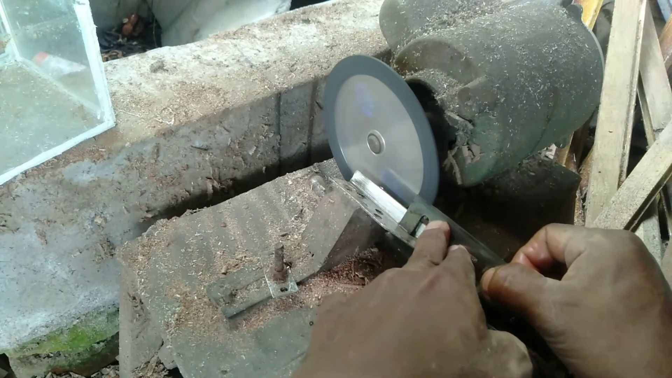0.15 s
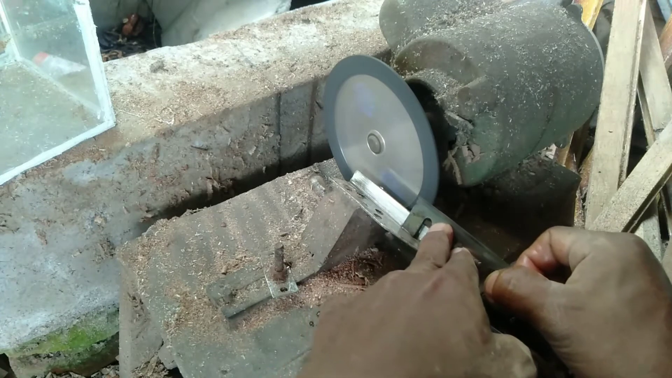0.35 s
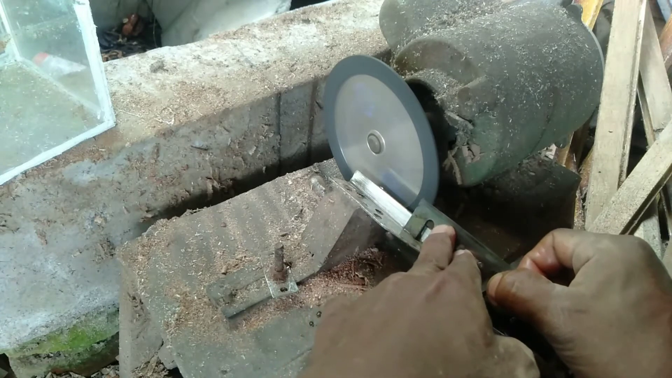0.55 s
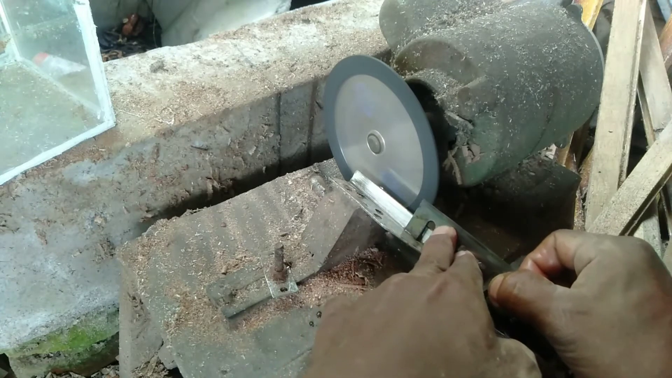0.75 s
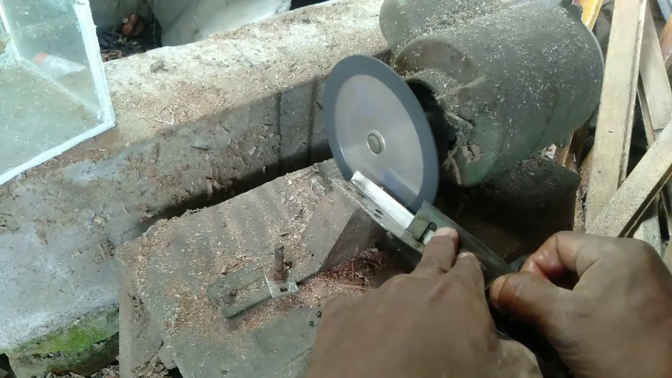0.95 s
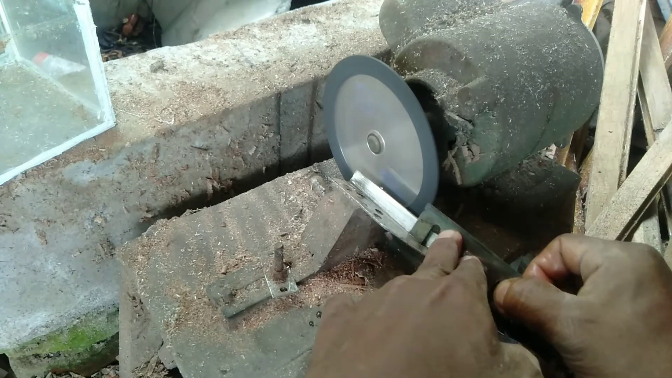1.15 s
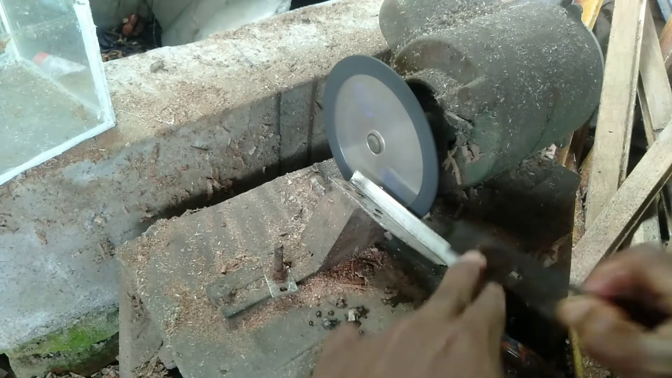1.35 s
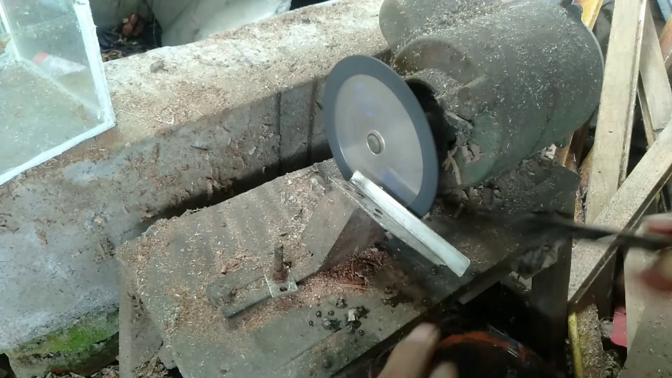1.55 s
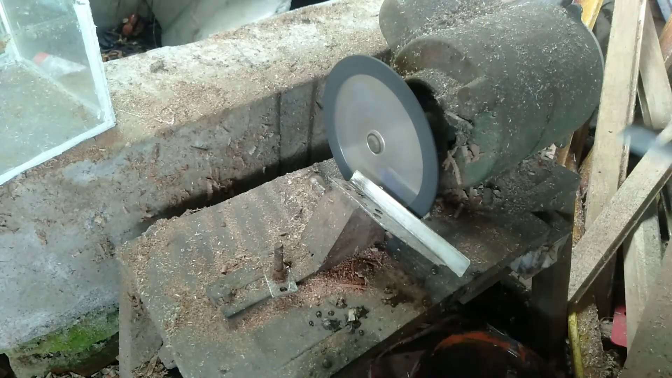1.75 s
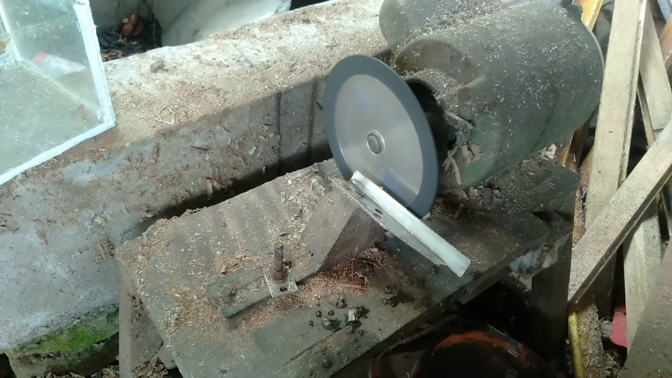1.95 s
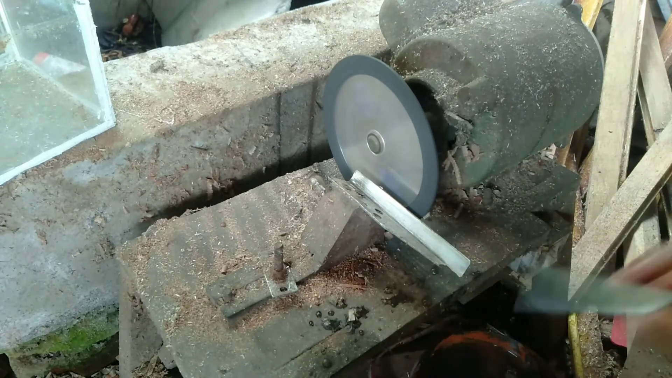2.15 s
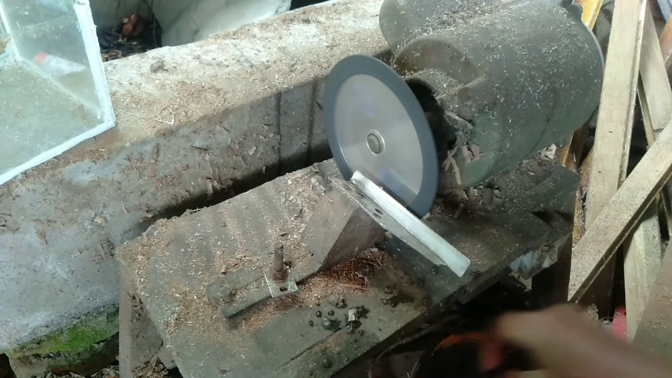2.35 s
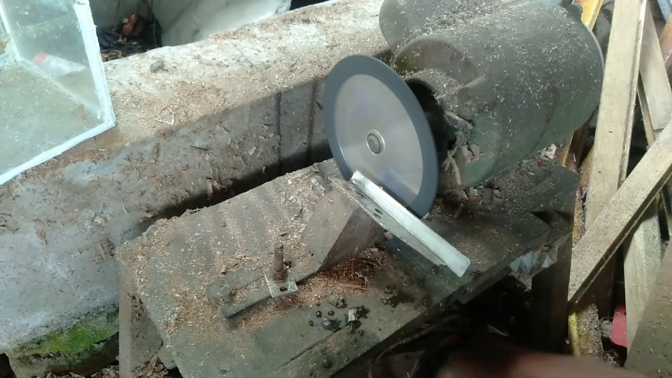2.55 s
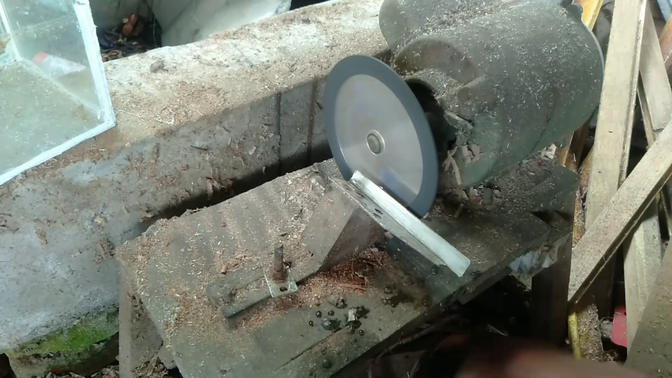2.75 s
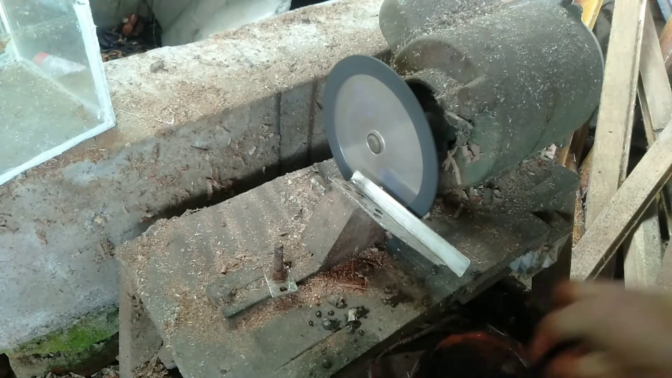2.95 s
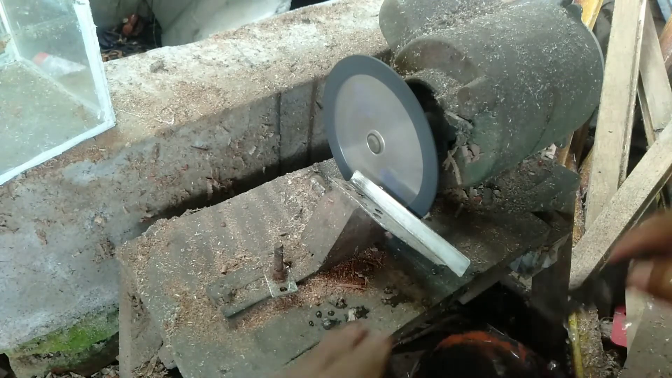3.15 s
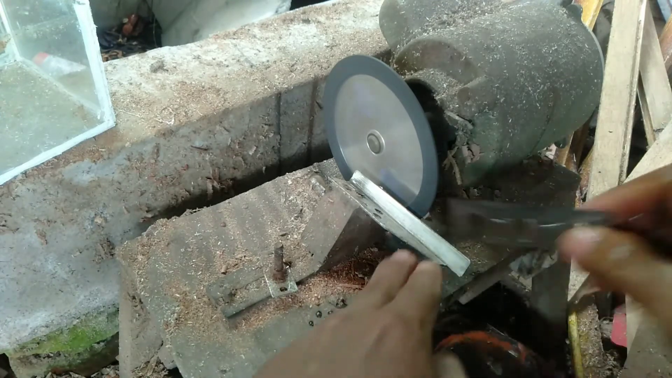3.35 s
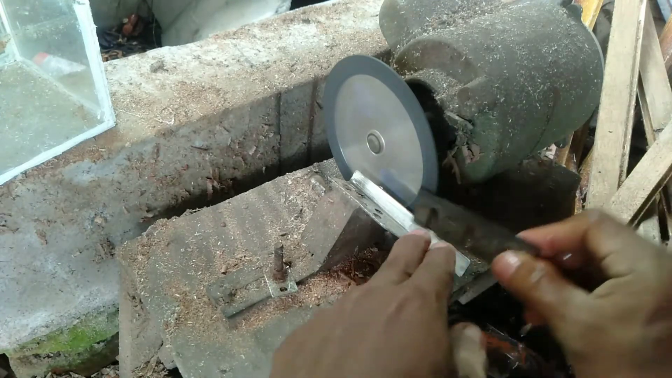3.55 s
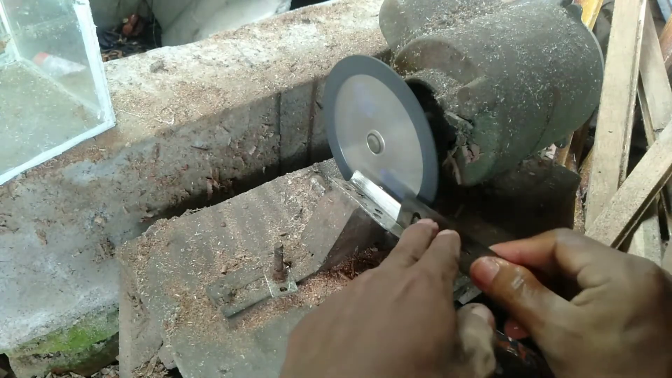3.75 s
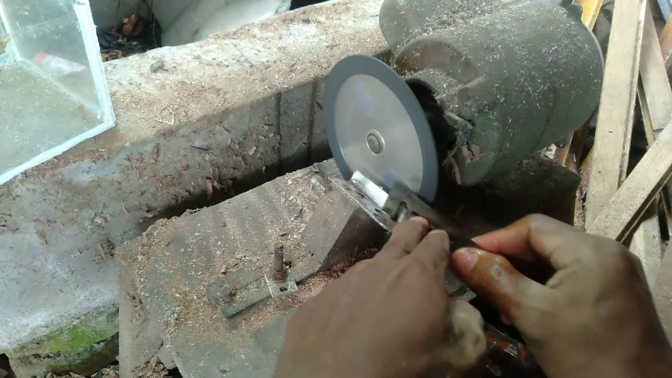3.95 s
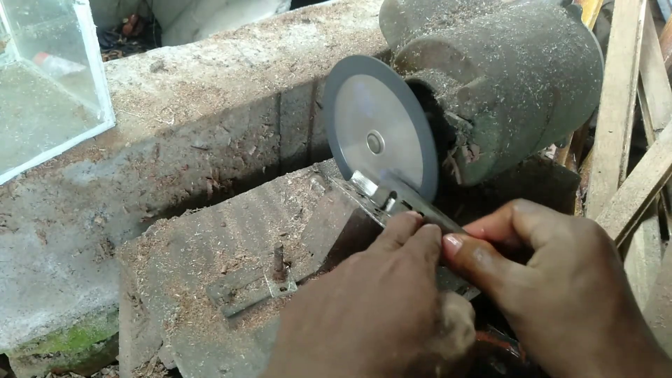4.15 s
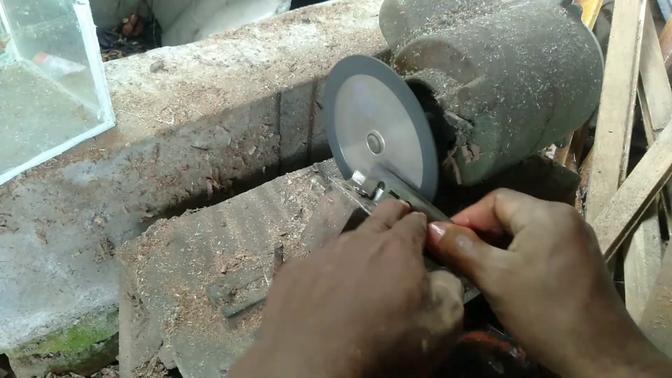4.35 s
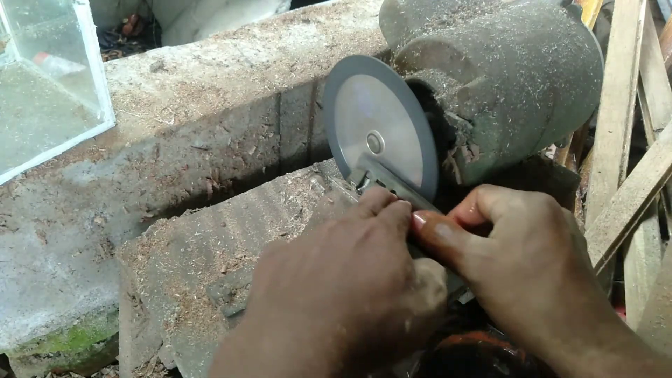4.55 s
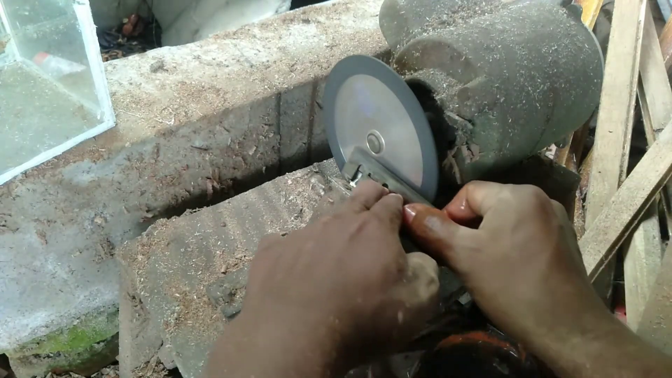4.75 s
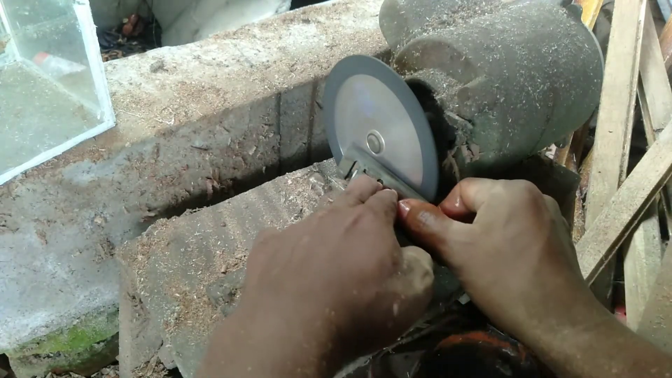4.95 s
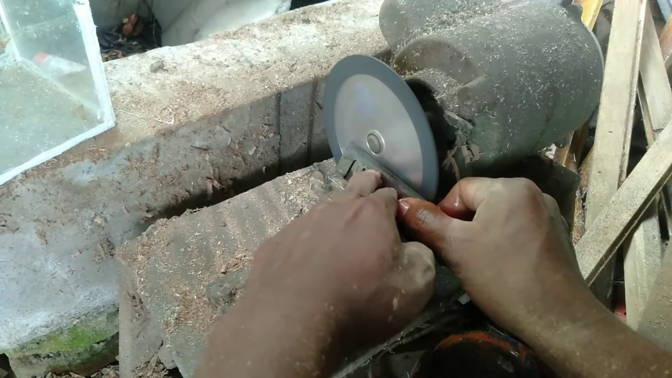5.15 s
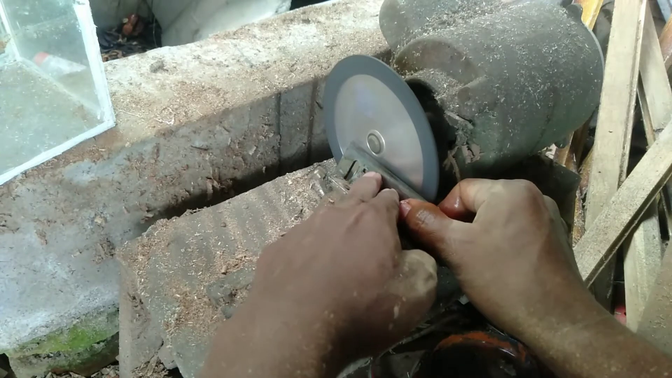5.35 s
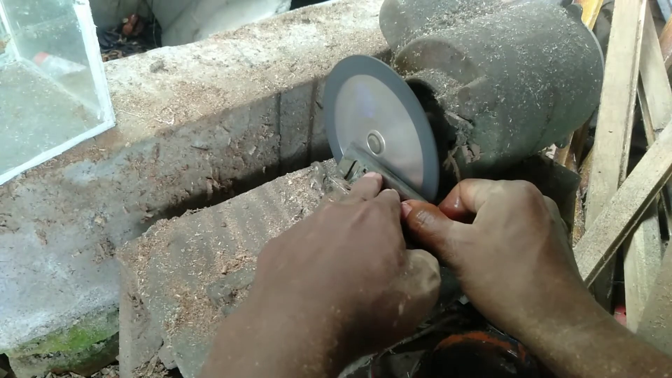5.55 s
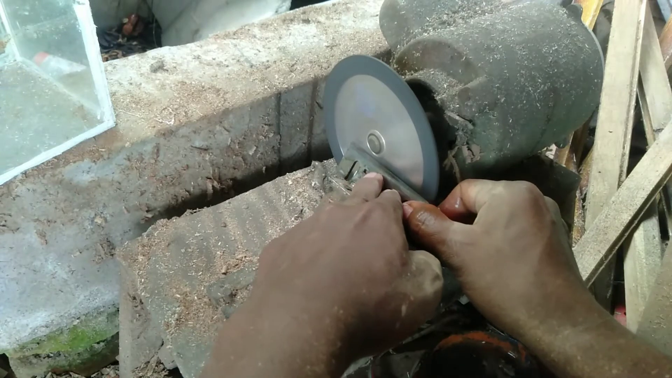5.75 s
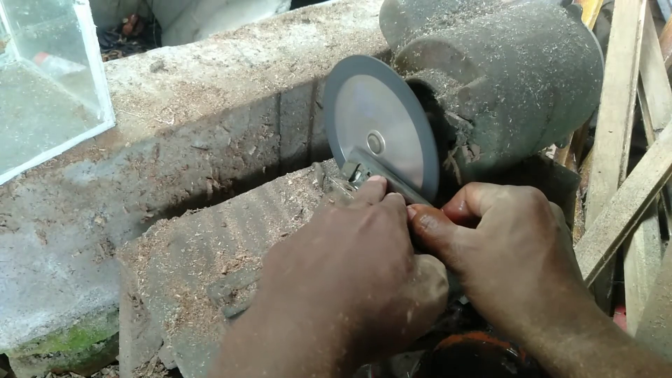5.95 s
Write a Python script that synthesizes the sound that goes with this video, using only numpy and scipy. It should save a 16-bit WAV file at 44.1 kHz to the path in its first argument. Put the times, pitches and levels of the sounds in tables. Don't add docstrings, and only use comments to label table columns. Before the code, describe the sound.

Close at a workshop bench, a steel blade screeches against a motor-driven wheel with a dense, high, ringing buzz. It lifts off abruptly, leaving a much quieter hum with a fast loose rattle and tiny grit crackles. A cluster of sharp metal clacks marks the blade being set down, then a second pass begins lightly and builds into a harsh, juddering screech. Dry, close mono sound with little room.

```python
import sys
import numpy as np
from scipy import signal
from scipy.fft import rfft, irfft
from scipy.io import wavfile

SR = 44100
rng = np.random.default_rng(int(sys.argv[2]) if len(sys.argv) > 2 else 0)


def dump(signal):
    limited = np.clip(np.atleast_2d(signal).T, -1, 1)
    pcm = np.round(limited * 32767).astype(np.int16)
    wavfile.write(sys.argv[1], SR, pcm)


def convert_level_to_amplitude(level_db):
    exponent = np.asarray(level_db, float) / 20
    return 10 ** exponent


N = 268128
T = np.arange(N) / SR
HZ = np.fft.rfftfreq(N, 1 / SR)
CHATTER_ORDER = 20

# t/s, f/Hz
SHAFT = [(0, 49.5), (.5, 49.53), (.62, 49.63), (.9, 49.73), (1.1, 49.7), (1.3, 49.91), (2.4, 49.87),
         (3.5, 49.94), (4.25, 49.93), (4.5, 49.83), (5.15, 49.83), (5.3, 49.7), (5.47, 49.585), (5.7, 49.6),
         (5.87, 49.65), (6.08, 49.57)]
# t/s, level/dB
PASSES = [
    [(0, -29.5), (.16, -27.5), (.29, -30.5), (.57, -30), (.8, -30), (1.19, -31), (1.225, -44.5),
     (1.255, -51), (1.27, -54)],
    [(4.27, -46), (4.33, -41.5), (4.4, -37.5), (4.7, -32.5), (5.0, -34), (5.08, -34.5), (5.43, -29),
     (5.9, -27.5), (6.08, -29.5)],
]
STROKES = [
    .4035,
    .909,
    4.616,
    5.644,
    5.644,
]
WHEEL_HZ = [8010, 8400, 9060, 10650, 11170, 12150, 13260, 13880, 14680, 15250]
WHEEL_WIDTH = [50, 50, 170, 50, 110, 80, 80, 100, 90, 140]
WHEEL_DB = [
    (-4, -7.5, -19, -32, -8.5, -39, -12, -5.5, -7, -18),
    (-4, -11, -13.5, -15, -8.5, -30, -14, -7, -9, -18),
    (2, 6.5, -14, -3, -12, -20, -1, -2, -3, -5),
    (-10, -6, -18, -15, -9, -24, -5, -9, -6, -13),
    (-5, -2.5, -16, -9, -6, -20, -4, -5, -4, -9),
]
WHEEL = [list(zip(WHEEL_HZ, WHEEL_WIDTH, row)) for row in WHEEL_DB]
# f/Hz, width/Hz, level/dB
CASING = [(820, 13, 3), (1041, 41, -2.5), (1874, 18.3, -9), (2103, 18, -9.5), (2386, 17, -15.5),
          (3500, 12, -10.5), (4000, 110, -14.5), (4240, 66, -12.5), (5080, 17, -12.5), (5400, 12, -7.5),
          (6560, 710, -12), (7520, 83, -11), (8280, 260, -21), (14900, 230, -15.5)]


def evened(x):
    return x / np.sqrt(np.mean(x ** 2) + 1e-20)


def read(points, hz):
    f, value = np.transpose(points)
    return np.interp(np.log(hz + 1), np.log(f + 1), value)


def add(mix, s, sound):
    part = mix[max(round(s * SR), 0):][:len(sound)]
    part += sound[:len(part)]


def body(modes):
    return sum((-1) ** k * convert_level_to_amplitude(db) / (1 + 2j * (HZ - hz) / width) for k, (hz, width, db) in enumerate(modes))


def through(x, response):
    return irfft(rfft(x) * response, N)


def wander(rate, size=32):
    steps = rng.standard_normal(N // size + 1)
    step_hz = np.fft.rfftfreq(len(steps), size / SR)
    slow = irfft(rfft(steps) * np.exp(-(step_hz / rate) ** 2), len(steps))
    return np.interp(np.arange(N) / size, np.arange(len(steps)), evened(slow))


def turns():
    return np.cumsum(np.interp(T, *np.transpose(SHAFT))) / SR


def grit(size=888, count=4):
    likeness = .985
    fresh = rng.standard_normal((460, size))
    rim = rfft(signal.lfilter([1], [1, -likeness], fresh, axis=0)[140:], axis=1)
    rim = irfft(rim / abs(rim) ** .65, size, axis=1).ravel()
    fine = signal.resample_poly(evened(rim), count, 1)
    return np.interp(turns() * size * count, np.arange(len(fine)), fine)


def slaps(off_spot, rows):
    return sum(convert_level_to_amplitude(db) * np.exp(-((off_spot - lag) / wide) ** 2) * np.cos(2 * np.pi * order * (off_spot - lag))
               for lag, order, wide, db in rows)


def grip_bands():
    # from t/s, slide time/s, low ring level/dB, rumble level/dB (against the screech)
    grip_rows = [
        (0, .088, -9, -22.5),
        (.62, 0.19, -8.5, -23),
        (4.2, 0.12, -5.5, -19),
        (5.25, 0.35, -9.5, -19.5),
        (5.75, 0.2, -15.5, -18.5),
    ]
    # repeating share/0-1, its edge f/Hz, stroke level/dB, width/turns, chatter level/dB
    cut_rows = [
        (0.92, 26000, 3, 0.1, -27),
        (0.88, 9600, 3.5, 0.1, -22),
        (0.71, 6300, 3, 0.08, -10),
        (0.92, 20000, 4.5, 0.15, -16),
        (.95, 18000, 2.5, 0.12, -14),
    ]
    # f/Hz, width/Hz, level/dB
    flat_modes = [(941, 51, -6.5), (2030, 185, -5), (2764, 79, -6.5), (3270, 230, -11.5), (3720, 90, -16),
                  (4000, 38, -10.5), (4860, 87, -16), (5320, 33, -4.5), (5606, 100, 0), (6680, 96, -5),
                  (7240, 98, -13.5)]
    tilted_modes = [(1030, 120, -32.5), (1960, 100, -7), (2678, 72, -9), (3600, 73, -13), (4000, 200, -17),
                    (4880, 30, -10), (5050, 58, -11), (5330, 70, -3), (5600, 60, -3), (5790, 52, -5),
                    (6250, 150, -16), (6640, 110, -11), (7000, 49, -12)]
    light_modes = [(431, 140, -8.5), (647, 83, -11.5), (850, 30, -26), (1060, 90, -13), (1774, 49, -13.5),
                   (2090, 280, -8), (2814, 146, -8), (3410, 84, -8), (3700, 160, -12), (5467, 105, 6.5),
                   (5740, 48, 5), (6560, 390, -3.5), (7700, 90, -8)]
    hard_modes = [(964, 24, -2.5), (1255, 50, -1), (1782, 40, -16), (1970, 60, -5.5), (2420, 69, -16),
                  (3700, 70, -11), (5010, 40, -12), (5400, 65, -4), (5510, 70, -4), (5770, 40, -4),
                  (6050, 200, -15), (6690, 50, -7), (7040, 70, -5), (7280, 50, -9), (7730, 80, -6)]
    tip_modes = [(920, 76, -9), (1270, 37, -10.5), (1560, 200, -17), (1900, 130, -13), (2456, 200, -15),
                 (3300, 80, -13), (3650, 50, -13), (4340, 240, -15), (5020, 100, -8), (5400, 130, -2),
                 (5770, 60, -2), (5900, 80, -2.5), (6080, 120, -5), (6590, 61, -6), (7000, 50, -8),
                 (7260, 100, -9), (7600, 300, -13)]
    ring_modes = [flat_modes, tilted_modes, light_modes, hard_modes, tip_modes]
    # f/Hz, level/dB per Hz
    scrape_curve = [(88, -64), (150, 9), (730, -6), (979, 6.5), (1630, -6), (1980, 8), (3040, 4),
                    (5680, 1.5), (10200, 4), (14200, 2), (16000, -28)]
    # f/Hz, width/Hz
    dark_gaps = [
        [(3040, 60), (4500, 50), (10220, 150), (12950, 70)],
        [(1480, 130), (2980, 90), (4380, 130), (10220, 140), (12950, 70)],
        [(1500, 110), (4650, 70), (9350, 150), (10150, 50), (11720, 190), (12050, 50), (12500, 50)],
        [(950, 100), (3100, 40), (4080, 60), (4680, 70), (9570, 90), (10200, 50), (11900, 190), (12650, 40)],
        [(950, 100), (3100, 70), (3900, 110), (4680, 50), (11800, 110)],
    ]
    # lag/turns, shaft order, width/turns, level/dB over pressure
    slap_rows = [
        [(.07, 41, .06, 4), (.07, 115, .05, 1), (.07, 165, .04, 0), (.045, 285, .05, 2)],
        [(.08, 39, .08, -18), (.05, 110, .1, -6), (.08, 54, .12, -14)],
        [(.17, 39, .07, -7), (.17, 110, .06, -8)],
        [(0, 40, .15, -11), (.1, 74, .08, -12), (.2, 170, .14, -4), (.1, 145, .08, -7)],
        [(0, 40, .15, -14), (.2, 170, .14, -5)],
    ]

    bands = np.zeros((3, N))
    under_2400, under_700 = [1 / (1 + (HZ / hz) ** 8) for hz in (2400, 700)]
    rumble_split = under_700 / (1 + (320 / (HZ + 1)) ** 6)
    splits = 1 - under_2400, under_2400 - under_700, rumble_split
    rim, tearing = rfft(grit()), rfft(rng.standard_normal(N))
    turn, unsteady = turns(), wander(13.0)
    bounces = evened(np.exp(2.5 * np.cos(2 * np.pi * CHATTER_ORDER * turn)))
    taken = [np.clip((T - start) / slide + .5 + (start == 0), 0, 1) for start, slide, *_ in grip_rows] + [0]
    for k, (share, edge_hz, stroke_db, wide, chatter_db) in enumerate(cut_rows):
        share = np.clip(share, 0, 1) / (1 + (HZ / edge_hz) ** 2)
        even = rim * np.sqrt(share) + tearing * np.sqrt(1 - share)
        off_spot = (turn - np.interp(STROKES[k], T, turn) + .5) % 1 - .5
        spot = np.exp(-abs(off_spot / wide) ** 3)
        stroke = irfft(even, N) * convert_level_to_amplitude(stroke_db * spot + .5 * unsteady)
        chatter = convert_level_to_amplitude(chatter_db) * spot * (bounces - bounces.mean())
        force = rfft(stroke + chatter)
        modes = [(hz, max(width, 38), db) for hz, width, db in ring_modes[k] + WHEEL[k]]
        response = body(modes) + convert_level_to_amplitude(-27.5 + read(scrape_curve, HZ))
        for hz, width in dark_gaps[k]:
            response *= 1 - .985 * np.exp(-((HZ - hz) / width) ** 4)
        pushes = (force, force, even)
        rung = np.array([irfft(push * response * split, N) for push, split in zip(pushes, splits)])
        rung[1] *= convert_level_to_amplitude(0.5 * stroke_db * np.roll(spot, 40))
        balance = (0, *grip_rows[k][2:])
        held = taken[k] - taken[k + 1]
        bands += held ** 0.65 * np.array([convert_level_to_amplitude(db) * evened(band) for db, band in zip(balance, rung)])
        bands[0] += held * convert_level_to_amplitude(unsteady) * slaps(off_spot, slap_rows[k])
    return bands


def grinding():
    firm_db, low_follow, rumble_follow = -31.5, 0.67, 0.18
    screech, low_ring, rumble = grip_bands()
    landing = np.exp(-abs(T - PASSES[1][2][0]) / 0.18)
    lumps = convert_level_to_amplitude(2.2 * wander(30) + 10 * landing)
    landing_low_db = 5 * np.exp(-((T - 4.46) / 0.15) ** 2)
    out = np.zeros(N)
    for rows in PASSES:
        s, press_db = np.transpose(rows)
        arriving = np.clip((T - s[0]) / 0.14 + (s[0] == 0), 0, 1)
        leaving = np.clip((s[-1] - T) / 0.011 + (s[0] > 0), 0, 1)
        over_db = np.interp(T, s, press_db) - firm_db
        grip = np.clip(1.6 + over_db / 12, 0, 1)
        lower = convert_level_to_amplitude(low_follow * over_db + landing_low_db) * low_ring
        lower += convert_level_to_amplitude(rumble_follow * over_db) * lumps * rumble
        out += arriving * leaving * convert_level_to_amplitude(firm_db) * (convert_level_to_amplitude(over_db) * screech + np.sqrt(grip) * lower)
    return out


def singing():
    sung_orders = [19, 20, 54, 56, 115, 117, 113, 162, 39, 161, 53, 107, 21, 110, 168, 116, 111, 109, 25,
                   118, 120, 122, 170, 111, 17]
    # middle t/s, half length/s, level/dB rms
    swells = [(.3, 1, -50), (0.11, 0.83, -42), (0.1, 0.72, -35), (0.11, 0.39, -39), (0.23, .2, -39),
              (0.59, .22, -38), (0.79, .4, -37.5), (.5, 0.12, -45), (0.94, 0.37, -41), (0.85, .5, -38),
              (0.81, 0.11, -43), (1.16, 0.22, -41), (4.85, 0.37, -51), (5.2, 0.49, -44), (4.9, 0.17, -59),
              (5.31, 0.16, -41.5), (5.4, 0.25, -44), (5.8, 0.43, -37.5), (5.36, .2, -54), (5.92, 0.12, -36),
              (6, .1, -39), (5.4, 0.16, -35), (5.84, 0.16, -47), (1.15, .07, -39), (1.14, .1, -42.5)]
    turn = turns()
    touching = np.clip((PASSES[0][6][0] - T) / 0.043, 0, 1) + (T > PASSES[1][0][0])
    flutter = [1.56 * wander(10) for _ in range(4)]
    out = np.zeros(N)
    for order, (s, half, db) in zip(sung_orders, swells):
        on = abs(T - s) < 2 * half
        swell_db = db - 8 * ((T[on] - s) / max(half, .05)) ** 2 + flutter[order % 4][on]
        out[on] += convert_level_to_amplitude(swell_db) * np.cos(2 * np.pi * (order * turn[on] + rng.random()))
    return np.sqrt(2) * touching * out


def bounce(wide=0.17, between_db=-9.5, double_db=-11, slower=0.8):
    # t/s, level/dB
    bounce_levels = [
        (5.1, -34),
        (5.2, -36.5),
        (5.3, -36),
        (5.5, -34),
        (5.836, -31),
        (6.08, -35.5),
    ]
    turn = turns() - np.interp(STROKES[-1] + .001, T, turns())
    off_spot = (turn + .5) % 1 - .5
    swing = 2 * np.pi * CHATTER_ORDER * turn
    slowed = np.cos(swing - 2 * np.pi * slower * off_spot)
    burst = np.exp(-abs(off_spot / wide) ** 3) * (slowed + convert_level_to_amplitude(double_db) * np.cos(2 * swing))
    cycles = evened(burst + convert_level_to_amplitude(between_db) * np.cos(swing))
    onset = np.clip((T - bounce_levels[0][0]) / 0.089, 0, 1)
    return onset * convert_level_to_amplitude(np.interp(T, *np.transpose(bounce_levels))) * cycles


def knocks():
    # t/s, crack level/dB, crack f/Hz, thud level/dB, ring level/dB (against the crack)
    knock_rows = [(1.307, -37, 3530, 14, -27), (3.525, -28, 14500, -27, -27), (3.5412, -22, 2500, 4, -10),
                  (3.594, -25, 2600, 2, -18), (3.615, -34, 7500, 14, -10), (3.629, -27.5, 6040, -25, -12),
                  (3.651, -15.5, 2870, 2.5, 0), (3.6542, -31, 3200, 7, -7), (3.6525, -14, 2040, -20, -30),
                  (3.653, -25.5, 13000, -30, -30), (3.66, -37, 3300, -9, -20), (3.7828, -26, 2500, 2, -11),
                  (3.931, -40, 6800, 13, 2), (4.2205, -48, 7500, -8, -6), (4.27, -40, 4000, -9, -12),
                  (4.283, -36, 4500, -11, -12)]
    # f/Hz, level/dB, decay by 60 dB t/s
    blade_modes = [(1860, -20, .05), (2340, -14, .06), (2630, -13, .06), (3235, -11, .08), (3900, -22, .04),
                   (5200, -8, .08), (6920, -1, .085), (8200, -10, .04), (9090, -12, .02), (10400, -20, .04),
                   (12520, -22, .025), (13670, -13, .025)]
    # t/s, level/dB
    graze_rows = [
        (1.196, -38),
        (1.214, -39.5),
        (1.235, -44.5),
        (3.525, -46.5),
        (4.293, -53),
        (4.314, -45),
        (4.335, -42),
        (4.353, -43),
    ]
    out, touch, t = np.zeros(N), np.zeros(N), np.arange(5000) / SR
    ring = sum(convert_level_to_amplitude(db - 60 * t / min(t60, .08)) * np.sin(2 * np.pi * hz * t) for hz, db, t60 in blade_modes)
    ring = ring * (1 - np.exp(-t / 0.00011)) / abs(ring).max()
    thud = convert_level_to_amplitude(-60 * t / 0.017) * np.sin(2 * np.pi * 290 * t) * (1 - np.exp(-t / 0.0064))
    for s, db, crack_hz, thud_db, ring_db in knock_rows:
        burst = rng.standard_normal(len(t)) * np.exp(-t / 0.0038)
        crack = signal.lfilter(*signal.iirpeak(min(crack_hz, 15000), 2.4, SR), burst)
        add(out, s, convert_level_to_amplitude(db) * (crack + convert_level_to_amplitude(ring_db) * ring + convert_level_to_amplitude(thud_db) * thud))
    for s, db in graze_rows:
        add(touch, s, convert_level_to_amplitude(db) * rng.standard_normal(len(t)) * np.exp(-t / 0.0029))
    wheel = [(2740, 30, 12), (5440, 70, 5)] + WHEEL[0][:2] + [(hz, 250, -19) for hz in WHEEL_HZ[6:]]
    return out + convert_level_to_amplitude(23.5) * through(touch, body(wheel) * HZ / 3500)


def rattle(rise=0.003, fall=0.008):
    # t/s, peak level/dB, brightness
    # level/dB
    beat_rows = [(1.292, -29, -12.5), (1.303, -32, -22), (1.349, -29, -13.5), (1.403, -35.5, -4),
                 (1.458, -36, -4.5), (1.509, -44, -17), (1.568, -38, -3), (1.609, -37, -5),
                 (1.659, -35.5, -12), (1.707, -35, -16), (1.788, -33, -8), (1.848, -32, -15),
                 (1.888, -34, -10), (1.95, -33.5, -12), (2.01, -28.5, -11.5), (2.07, -27, -14.5),
                 (2.119, -35, -4.5), (2.173, -28, -12), (2.23, -32.5, -4.5), (2.29, -30.5, -12),
                 (2.329, -31, -13), (2.39, -29, -10.5), (2.45, -26.5, -15.5), (2.51, -28.5, -14),
                 (2.566, -30, -18), (2.608, -34, -8), (2.62, -30.5, -13), (2.671, -26.5, -15),
                 (2.708, -34, -26), (2.729, -32, -8), (2.747, -32.5, -17), (2.788, -35.5, -4.5),
                 (2.841, -29.5, -13), (2.895, -28.5, -18), (2.954, -27.5, -18), (3.009, -27.5, -19.5),
                 (3.059, -29, -19.5), (3.115, -26, -22), (3.171, -25.5, -21.5), (3.228, -28.5, -17),
                 (3.287, -32, -20), (3.329, -32.5, -25), (3.393, -30, -26), (3.452, -29, -18),
                 (3.56, -28, -15),
        (3.616, -27, -17),
        (3.718, -35, -34),
        (4.06, -41, -21),
        (4.22, -28.5, -16.5),
        (4.276, -25.5, -23),
        (4.331, -26.5, -17),
        (5.823, -25.5, -14),
    ]
    clear_db, steep, shine_db = -27.5, 1.69, 6.5
    t = np.arange(2600) / SR
    shape = (1 - np.exp(-t / rise)) * np.exp(-t / fall)
    dull, bright = np.zeros((2, N))
    for s, db, bright_db in beat_rows:
        db = clear_db + steep * (db - clear_db)
        add(dull, s - .003, convert_level_to_amplitude(db) * shape / shape.max())
        add(bright, s - .003, convert_level_to_amplitude(db + bright_db + shine_db) * shape / shape.max())
    taps = rng.standard_normal(N) * convert_level_to_amplitude(2.0 * rng.exponential(1, N))
    split = 1 / (1 + (HZ / 1900) ** 4)
    shaken = body([(hz, max(2.8 * width, hz / 20), db) for hz, width, db in CASING])
    low = (shaken + convert_level_to_amplitude(-14.5) * HZ / (HZ + 500)) * split
    high = (shaken + convert_level_to_amplitude(-32.5)) * (1 - split) / (1 + (HZ / 11000) ** 2)
    low_rms, high_rms = [np.std(through(taps, response)) for response in (low, high)]
    low_part = convert_level_to_amplitude(-8.5) * through(taps * dull, low) / low_rms
    return low_part + convert_level_to_amplitude(-7.0) * through(taps * bright, high) / high_rms


def crackle():
    # t/s, peak level/dB
    tick_rows = [(1.3909, -43), (1.4512, -44), (1.5684, -48), (1.7894, -47), (1.8503, -46), (1.8867, -48),
                 (1.9491, -51), (2.0089, -43), (2.1092, -45), (2.1641, -44), (2.224, -50), (2.2883, -43),
                 (2.3896, -45), (2.5093, -41), (2.5532, -37), (2.6101, -43), (2.6714, -48), (2.7168, -40),
                 (2.7348, -40), (2.8899, -48), (2.9493, -45), (3.0097, -38), (3.0281, -46), (3.1089, -44),
                 (3.2152, -42), (3.2516, -48), (3.2701, -46), (3.288, -46), (3.4277, -44)]
    dust_per_s, dust_db, dust_s, dust_half_s = 90, -43, 2.55, 0.49
    starts, t = np.zeros(N), np.arange(400) / SR
    for s, db in tick_rows:
        starts[round(s * SR)] = convert_level_to_amplitude(db + 8)
    chance, size = rng.random(N), rng.exponential(1, N)
    density = dust_per_s / SR * np.exp(-((T - dust_s) / dust_half_s) ** 2)
    starts += (chance < density) * convert_level_to_amplitude(dust_db + 3.0 * size)
    out = signal.oaconvolve(starts, np.exp(-t / 0.0013))[:N] * rng.standard_normal(N)
    return through(out, body([(14800, 1500, 0), (9000, 6000, -8)]) * HZ / (HZ + 5000))


def rest():
    # t/s, level/dB
    jolt_rows = [
        (1.34, 15),
        (2.38, 4),
        (3.3, 3.5),
        (3.42, 6),
    ]
    shaking = rng.standard_normal(N) * convert_level_to_amplitude(3.2 * wander(33))
    free = (T > 1.24) & (T < 4.32)
    level_db = -60 + sum(db * (T > s) * np.exp(-abs(T - s) / 0.32) for s, db in jolt_rows)
    return free * convert_level_to_amplitude(level_db) * evened(through(shaking, body([(1862, 55, 0)]) ** 1.46))


def motor():
    # f/Hz, level/dB rms
    hum_tones = [(48.4, -64), (102.3, -69), (150.7, -70.5), (199.2, -66), (247.6, -57.5), (301.5, -73.5),
                 (398.4, -72.5), (500.6, -67.5), (694.4, -70), (748.3, -134.5), (796.7, -60),
                 (845.2, -54.5), (1050, -52.5), (1147, -60.5)]
    # f/Hz, level/dB rms
    cover_tones = [(63.4, -63.5), (74.5, -82), (266, -68.5), (124, -72.5)]
    # f/Hz, level/dB per Hz
    whir_curve = [(13, -47), (22, -18), (59, -8), (156, -18), (249, -14.5), (347, -14.5), (730, -7),
                  (837, -6.5), (935, -46), (1070, -3.5), (1410, -17.5), (1810, -16.5), (3060, -23.5),
                  (7190, -21), (16000, -37)]
    # middle t/s, half length/s, depth level/dB
    hand_damping = [(.36, 0.068, 15), (.75, 0.12, -1.5), (1.2, 0.39, 8), (4.053, 0.49, 11), (4.32, 0.14, 9),
                    (5.393, 0.12, 22), (5.655, 0.23, 2), (6.08, 0.27, 7)]
    flutter_order = 17
    idle_hz, turn = np.interp(2.5, *np.transpose(SHAFT)), turns()
    tones = np.zeros(N)
    damped_db = sum(db * np.exp(-((T - s) / half) ** 2) for s, half, db in hand_damping)
    for hz, db in hum_tones:
        order = round(hz / idle_hz)
        if order == 5:
            level_db = -54.5 - damped_db
        else:
            level_db = db + 1.5 + 1.8 * wander(4) + 3 * (order == flutter_order) * wander(22)
        tones += convert_level_to_amplitude(level_db) * np.sin(2 * np.pi * (order * turn + rng.random()))
    for hz, db in cover_tones:
        tones += convert_level_to_amplitude(db - 2.5 + 2.5 * wander(0.93)) * np.sin(2 * np.pi * hz * T)
    whir = convert_level_to_amplitude(-51) * evened(through(rng.standard_normal(N), convert_level_to_amplitude(read(whir_curve, HZ))))
    shaking = rng.standard_normal(N) * convert_level_to_amplitude(3.0 * wander(34.0))
    casing = evened(through(shaking, body([(hz, max(width, hz / 30), db) for hz, width, db in CASING])))
    return np.sqrt(2) * tones + whir + convert_level_to_amplitude(-51.5) * casing


def scene():
    gap_hz, gap_width, depth = 5910, 390, 0.76
    bench = 1 - depth * np.exp(-((HZ - gap_hz) / gap_width) ** 2)
    machine = through(motor() + rattle(), bench)
    dry = grinding() + singing() + bounce() + machine + rest() + knocks() + crackle()
    return dry[None]


def low_pass(x):
    return signal.sosfilt(signal.butter(12, 16350, fs=SR, output="sos"), x)


def record(dry):
    lowpass = signal.firwin(2047, 15530, window=("kaiser", 9), fs=SR)
    limited = signal.oaconvolve(dry, lowpass[None], "same")
    return low_pass(limited)


dry = scene()
out = record(dry)
dump(out)
```